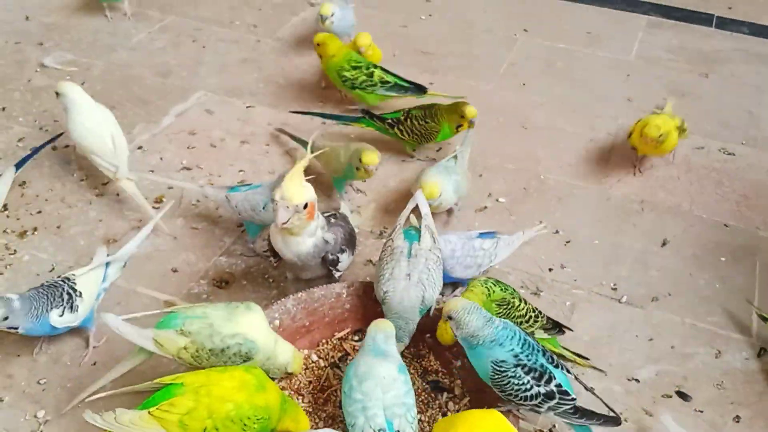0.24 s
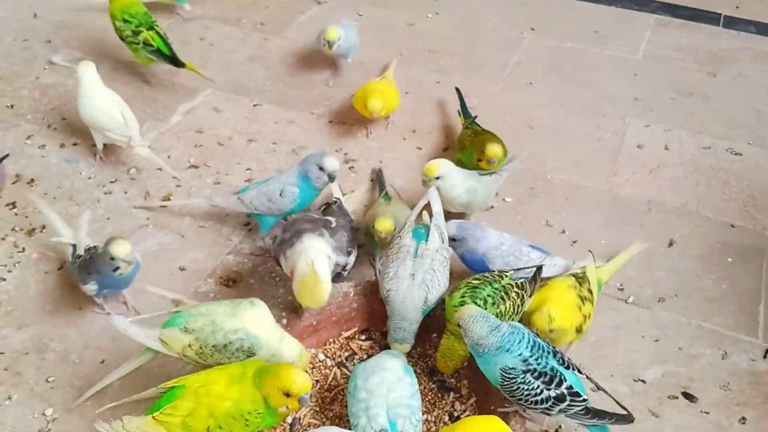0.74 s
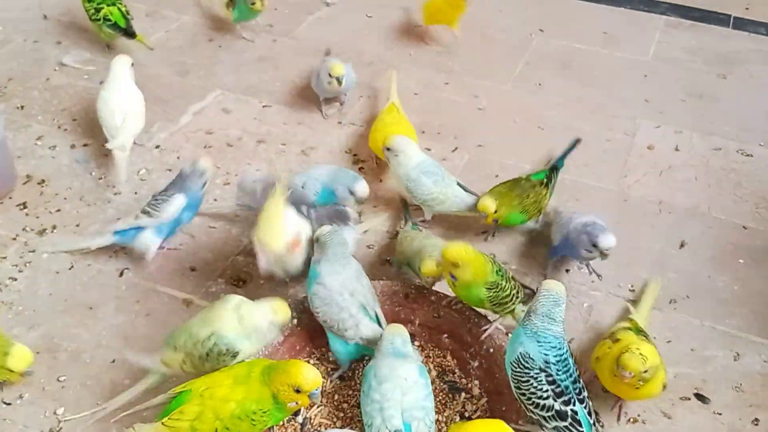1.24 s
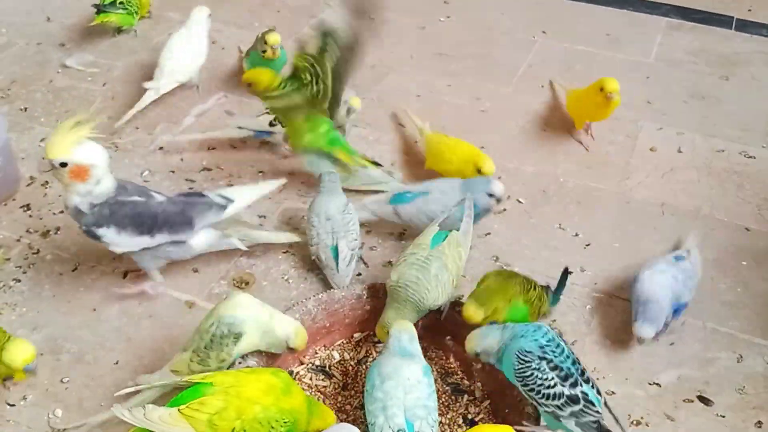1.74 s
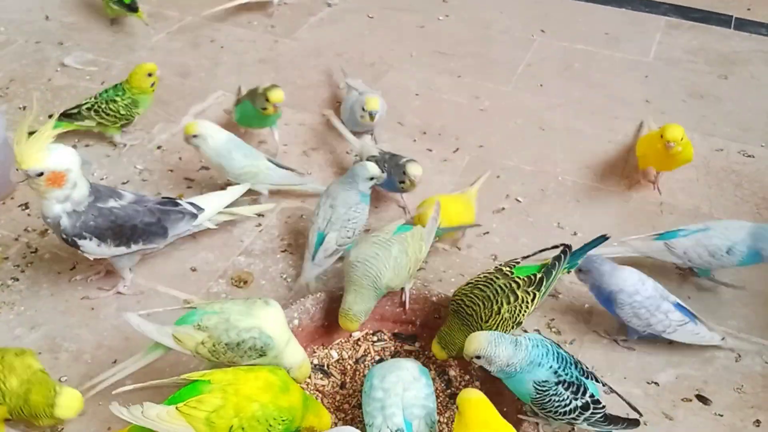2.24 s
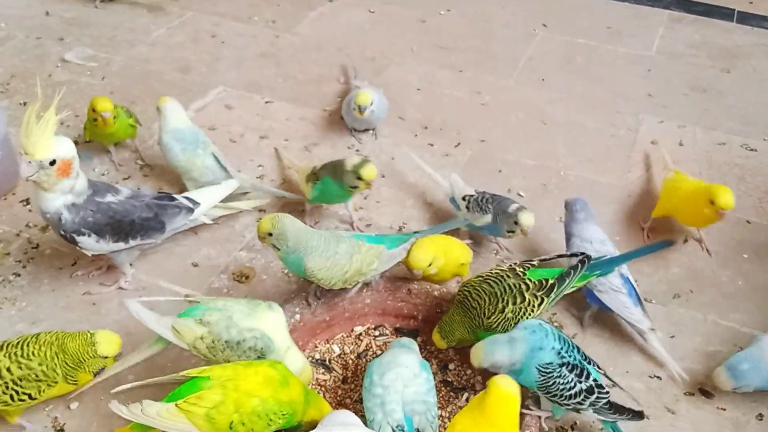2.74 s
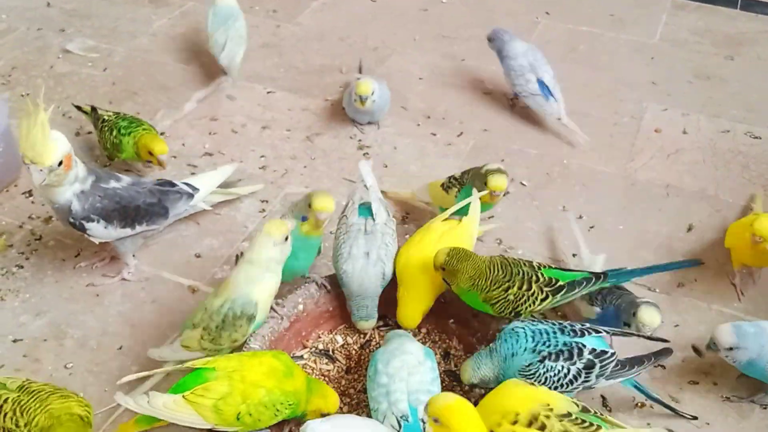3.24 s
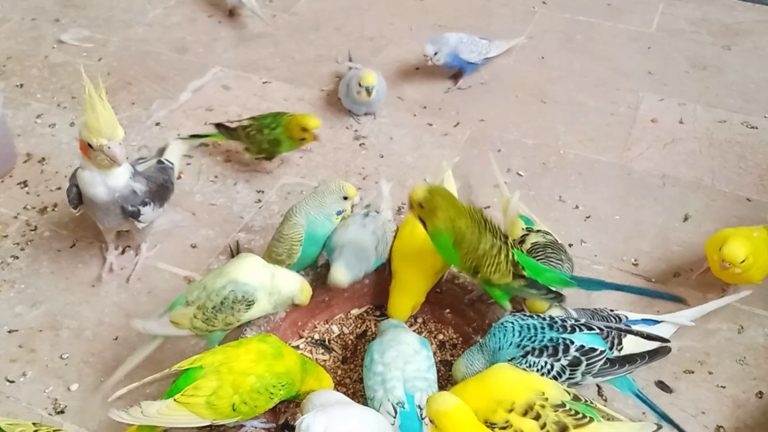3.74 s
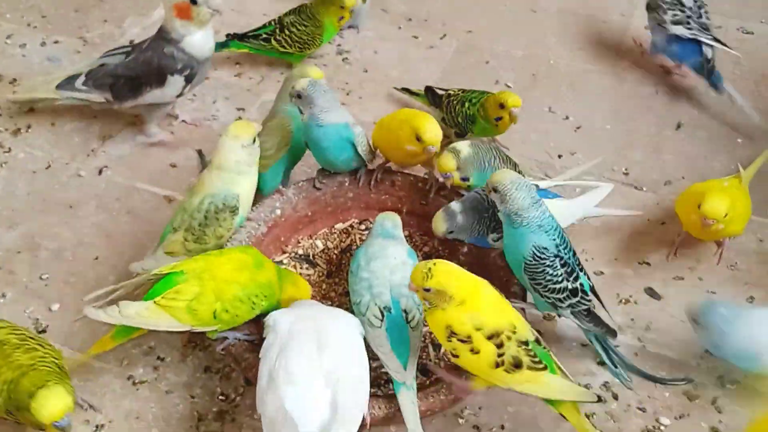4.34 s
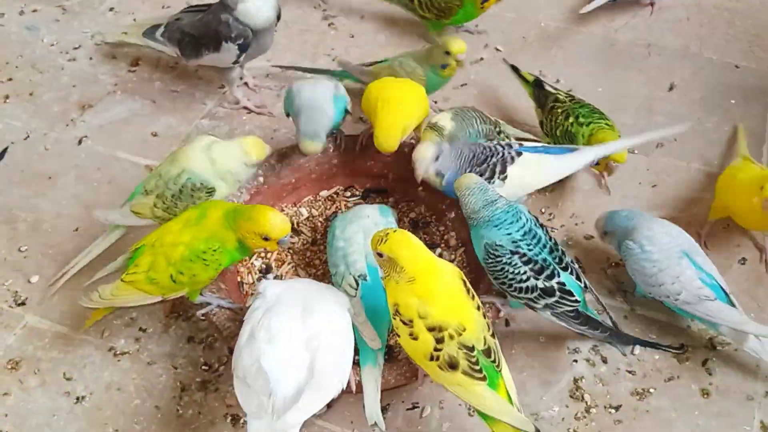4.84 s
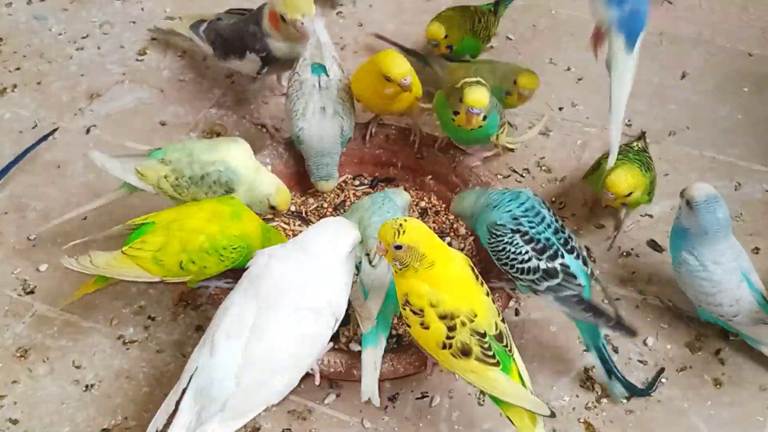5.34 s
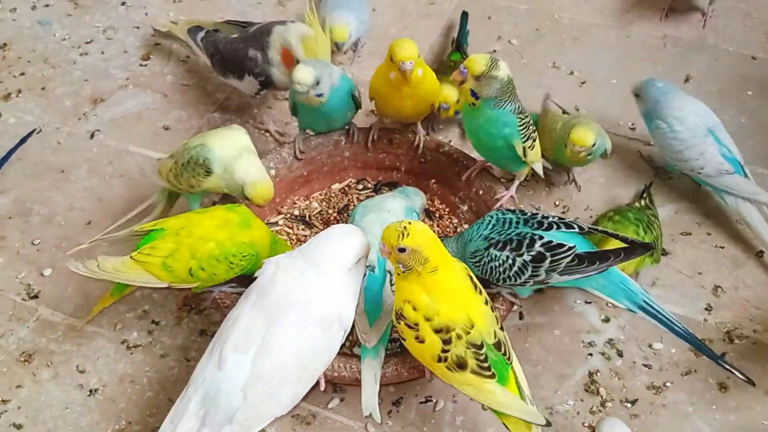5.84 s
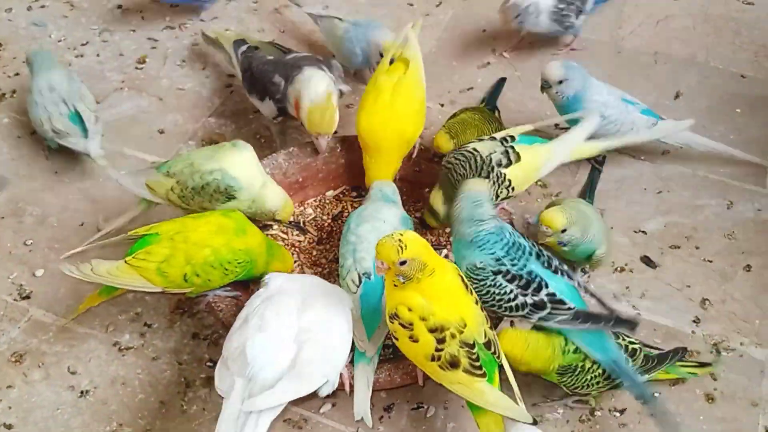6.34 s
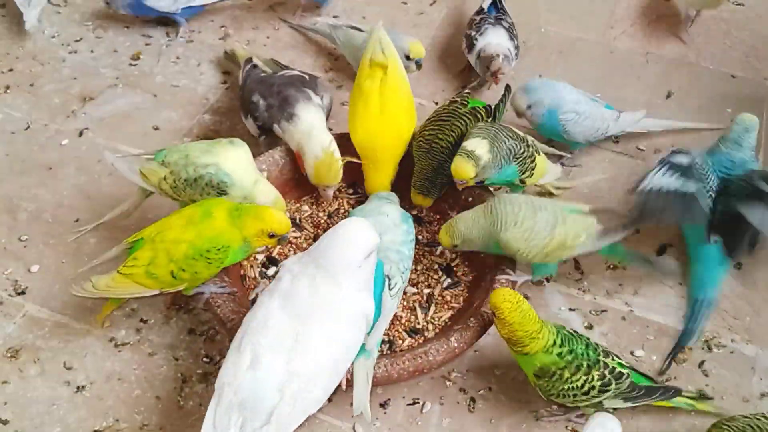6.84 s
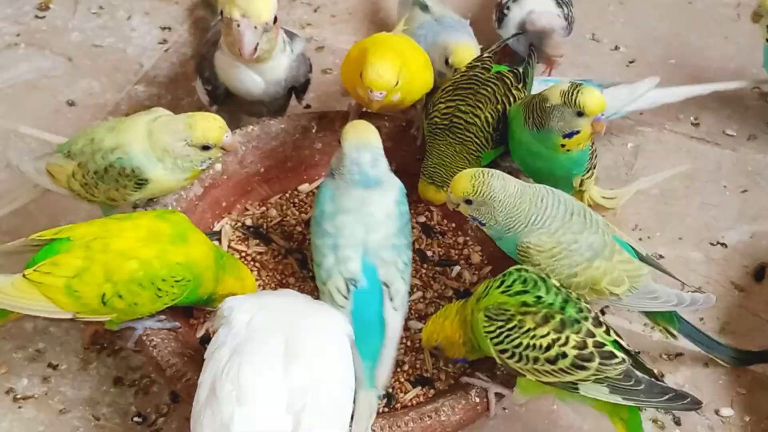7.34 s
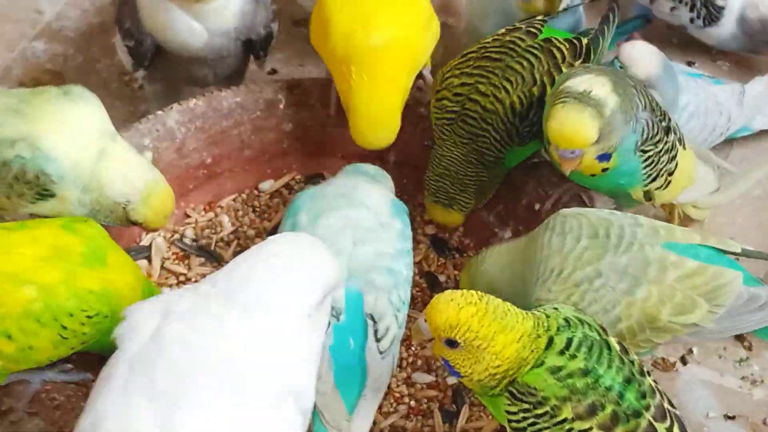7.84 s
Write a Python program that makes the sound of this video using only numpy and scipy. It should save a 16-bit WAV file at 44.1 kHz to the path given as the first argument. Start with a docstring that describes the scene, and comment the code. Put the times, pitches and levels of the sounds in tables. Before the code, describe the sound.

Budgie-like chirps, whistled notes and hoarse squawks build into a dense chatter, broken by fluttering take-offs and wind-like knocks in a hard-walled room.

```python
"""Small parrots feeding in a hard-walled room

Close to the microphone, short arching chirps built from harmonics and dry noise cracks of beaks on seed.
Around them, held notes, one long steady call, a low moan and hoarse squawks of two tumbling voices.
Birds taking off whirr their wings (pulsed noise), blow gusts on the microphone and knock it with low pushes.
A faint hum and room hiss run underneath at changing levels; random decaying tails give the room's echo."""
import sys
import numpy as np
from scipy import signal
from scipy.fft import rfft, irfft, next_fast_len
from scipy.io import wavfile
from scipy.ndimage import map_coordinates

SR = 44100
rng = np.random.default_rng(int(sys.argv[2]) if len(sys.argv) > 2 else 0)


def bounce(signal):
    """Save signal as a 16-bit WAV file at the path given by the first command-line argument."""
    frames = np.transpose(np.atleast_2d(signal))
    limited = np.clip(frames, -1, 1)
    pcm = np.round(limited * 32767).astype(np.int16)
    wavfile.write(sys.argv[1], SR, pcm)


N = 356328

# All levels are relative: the mix sets the final balance.
# Room tone. Each row: time in seconds, hum level in dB, hiss level in dB.
BACKGROUND = [(0, -51, -71), (.5, -60.5, -64.5), (1.07, -76.5, -84.5), (1.12, -59.5, -65), (1.9, -64, -72),
              (2.1, -62.5, -67), (4, -64.5, -66.5), (6, -58.5, -63), (7.2, -62, -67), (7.5, -57, -67),
              (8.04, -67, -79), (8.08, -66, -70)]
# Colour of the room hiss. Each row: frequency in Hz, relative level in dB.
HISS_SPECTRUM = [(80, -49), (150, 7.5), (480, -10), (800, -5.5), (2000, -9.5), (3500, -16), (6000, -31.5),
                 (11000, -24), (22000, -72)]
# Echo of the hard walls. Each row: frequency in Hz, time to decay by 60 dB in seconds.
ROOM_T60 = [(300, 0.8), (2500, 0.37), (9000, 0.41)]
# Response of the microphone. Each row: frequency in Hz, gain in dB.
MIC_RESPONSE = [(20, -2.5), (6000, 2), (8500, 0.5), (10500, -8.5), (12500, -25.5), (15400, -40)]
HUM_HZ, BAND_LIMIT_HZ = 69.1, 15480

# Wing whirr at take-off. Each row: full strength from in seconds, level in dB, then rise, hold and fall in seconds.
WHIRR_BOUTS = [(.01, -49.5, 0.11, 0.16, 0.061), (1.82, -50, 0.081, 0.0064, 0.15),
               (2.92, -38, 0.37, 0.27, 0.19), (4.09, -29, 0.067, 0.27, 0.28),
               (5.55, -39.5, 0.08, 0.011, 0.14), (5.8, -33, 0.13, 0.43, 0.2),
               (6.8, -30.5, 0.028, 0.18, 0.18), (7.4, -54.5, 0.18, 0.25, 0.11)]
# Gusts on the microphone. Each row: full strength from in seconds, level in dB, then rise, hold, fall in seconds.
GUST_BOUTS = [(.16, -39.5, 0.51, .01, 0.25), (1.82, -47.5, 0.23, .01, 0.2), (2.92, -54, 0.84, .01, 1),
              (4.09, -29.5, 0.18, .25, 0.4), (4.7, -39, 0.3, .07, 0.046), (5.58, -37, 0.063, .01, 0.15),
              (6.19, -45, 0.51, .01, 0.29), (6.8, -20, 0.083, .15, 0.23), (7.07, -15.5, 0.08, .01, 0.055),
              (7.25, -53.5, 0.041, .2, 0.65)]
# Feathers rustling close by. Each row: full strength from in seconds, level in dB, then rise, hold, fall in seconds.
RUSTLE_BOUTS = [(.1, -66, 0.15, 0.023, 0.079), (6.82, -57.5, 0.042, 0.064, 0.085)]
# Colour of the whirr. Each row: frequency in Hz, relative level in dB.
WHIRR_SPECTRUM = [(88, -42.5), (150, -5.5), (281, -3.5), (360, 1), (425, 7), (535, 4.5), (1040, -20.5),
                  (1500, -31.5), (1950, -48), (3300, -120)]
# Colour of the gusts. Each row: frequency in Hz, relative level in dB.
GUST_SPECTRUM = [(12, -55), (20, -32), (46, 3.5), (70, 4), (128, 3.5), (296, -10.5), (400, -30), (520, -45),
                 (880, -120)]
# Colour of the rustling. Each row: frequency in Hz, relative level in dB.
RUSTLE_SPECTRUM = [(2500, -120), (4500, -13), (6500, 6.5), (9500, 12.5), (14000, -16.5)]
SWELL_DB = 20  # level change over one rise or fall time
FAR_WHIRR_DB, FAR_GUST_DB = -6, -7  # restless wings elsewhere, over the hum level in BACKGROUND
# Single wing strokes that knock the microphone. Each row: start in seconds, level in dB.
THUMPS = [(2.683, -45.5), (4.226, -33.5), (5.581, -34.5), (6.791, -28.5), (7.046, -15.5), (7.061, -18.5)]
THUMP_HZ, THUMP_T60_S = 85.5, 0.117

# A low hollow moan. Each row: time in seconds, pitch in Hz, level in dB.
MOAN = [(7.12, 476, -48.5), (7.14, 456, -40), (7.482, 495.4, -78), (7.512, 430.5, -57), (7.75, 466, -66)]
# Held notes. Each row: start in seconds, length in seconds, level in dB, fade in dB, pitch in Hz, end pitch in Hz,
# 2nd harmonic over the fundamental in dB.
NOTES = [(0, 0.094, -42.5, 21, 3390, 3480, -42), (0, 0.058, -45, 1, 3030, 3020, -45),
         (0, 0.022, -37, 31, 1133, 1140, 4), (0.234, 0.11, -62, -3.5, 3530, 3280, -25),
         (0.274, 0.12, -64.5, -3, 1770, 1646, -40), (0.297, 0.1, -57.5, -8, 3103, 2885, -45),
         (0.461, 0.031, -52.5, -7.5, 1383, 1393, -41), (1.089, 0.082, -58.5, 2, 1410, 1460, 15),
         (1.246, 0.06, -53, -1, 954, 913, -3), (1.353, 0.068, -57, -5, 1480, 1216, -12),
         (1.427, 0.15, -47, 7, 1290, 1229, -21), (1.525, 0.089, -43, 5, 1900, 1752, -51),
         (1.692, 0.26, -37, 26.5, 1536, 1706, -32), (1.689, 0.34, -36.5, 27.5, 3425, 3370, -23),
         (4.04, 0.12, -41, 0, 3277, 3314, -41), (4.587, 0.29, -36.5, 2.5, 2954, 2945, -24),
         (4.638, 0.021, -20.5, 1, 3056, 3030, -21), (4.659, 0.045, -25.5, 3.5, 3900, 3860, -45.5),
         (4.759, 0.17, -34, 14, 1997, 2052, -27), (4.808, 0.027, -25.5, -5.5, 3030, 3055, -34),
         (4.824, 0.039, -30.5, -5.5, 3834, 3960, -57), (4.865, 0.45, -32, 23, 3000, 3090, -18),
         (4.681, 0.37, -39, 1, 3850, 3876, -31.5), (5.387, 0.094, -46, -6, 2875, 2790, -6),
         (5.166, 0.088, -31.5, 19, 1613, 1566, -5.5), (5.58, 0.057, -30.5, 19.5, 2830, 2950, -20),
         (5.645, 0.04, -28, 9.5, 2904, 2933, -14.5), (5.718, .03, -24.5, 6.5, 2850, 3680, -26),
         (5.735, 0.064, -31.5, 5, 3040, 3350, -28), (5.677, 0.45, -47, 4.5, 2895, 2884, -13.5),
         (6.387, 0.085, -50.5, -3, 1744, 1545, -32), (6.422, 0.26, -42, 17, 1540, 1457, -26.5),
         (6.435, 0.13, -49.5, -2, 3250, 2974, -29.5), (6.66, 0.09, -49, 4, 2290, 2540, -34),
         (6.629, 0.24, -54, 0, 3300, 3000, -23), (6.705, 0.016, -30, -2, 2985, 3275, -37),
         (6.807, 0.024, -33.5, -7, 3260, 3052, -40), (6.816, 0.056, -40, 11, 3247, 3300, -18),
         (7.977, 0.087, -75, 0, 2800, 2900, -21)]
NOTE_ROLLOFF_DB = 10.5  # each harmonic above the 2nd lies this far under the one before
# One long steady call. Each row: time in seconds, pitch in Hz, fundamental in dB, 2nd harmonic in dB.
LONG_CALL = [(2.385, 1183, -66, -59), (2.397, 1161, -35, -42), (2.435, 1116, -43, -41.5),
             (2.529, 1092, -37, -42), (2.858, 1133, -48, -49), (2.917, 1139, -43.5, -58),
             (2.95, 1027, -59, -48)]
# Harmonics 3 to 6 of the long call: level relative to the 2nd in dB.
LONG_CALL_UPPER_DB = (-7, -11, -31, -40)
# Hoarse squawks. Each row: start in seconds, length in seconds, level in dB, fade in dB, pitch in Hz,
# end pitch in Hz, overtones in dB, low rasp in dB.
SQUAWKS = [(0, 0.069, -33.5, 36, 3016, 3060, -31, 5), (1.139, 0.23, -42, 30, 3330, 3017, -18, -2),
           (1.289, 0.36, -50, -9, 2738, 1974, -12, -25), (1.627, 0.1, -35, -7.5, 2258, 2943, -22.5, -11.5),
           (1.691, 0.19, -31, 17, 3320, 3257, -5.5, 12), (1.976, 0.17, -26.5, 5.5, 3161, 2700, -12, -27),
           (2.123, 0.28, -34.5, -1, 3023, 2750, -19.5, -22), (2.399, 0.16, -54, -12, 2264, 2380, -14, -6),
           (2.828, 0.18, -29, 19, 2225, 2357, -18, 2), (3.873, 0.34, -34, 10.5, 2434, 2400, -19.5, -15),
           (4.108, 0.27, -39.5, -3.5, 2970, 2202, -11, 7),
           (4.555, 0.094, -31.5, -10.5, 2910, 2920, -16.5, -11.5),
           (4.633, 0.33, -17, 20.5, 3003, 3076, -10, -19), (4.888, 0.14, -19, 19, 3114, 3100, 1.5, -7.5),
           (4.999, .3, -25.5, 14, 3094, 3070, -7.5, -12), (5.733, 0.25, -35.5, 15, 3250, 3556, -21, -45),
           (5.948, 0.12, -36, 5.5, 4210, 4000, -20, -17), (6.434, 1, -54.5, 30.5, 3150, 2635, -15.5, -1),
           (6.77, 0.26, -38.5, 26, 3093, 2630, -11.5, 14)]
# Throat colour of the squawks. Each row: frequency in Hz, gain in dB.
THROAT = [(1000, -0.8), (3000, 1.47), (5500, 5.5), (6800, -2), (7800, -0.5), (9500, 2), (11000, -9),
          (14500, 13.5)]

# Beaks on seed. Each row: start in seconds, level in dB.
PECKS = [(3.905, -30), (5.642, -49), (7.18, -57), (7.8501, -53)]
# Chirps. Each row: time 4 ms after the onset in seconds, level in dB, top pitch in Hz,
# 2nd harmonic over the fundamental in dB, length in seconds (held to 8-80 ms).
CHIRPS = [(1.173, -24, 3520, -14.5, 0.018), (1.221, -24.5, 3320, -21, 0.018),
          (1.277, -20, 3087, -26.5, 0.02), (1.389, -38, 1780, -38, 0.016), (1.427, -26.5, 2490, -23, 0.024),
          (1.483, -16.5, 2326, -13, 0.015), (1.618, -16, 2278, -6.5, 0.013), (1.67, -22, 2156, -35, 0.032),
          (1.68, -26, 3270, -18, 0.022), (2.848, -16.5, 2425, -16.5, 0.012), (2.895, -27, 3210, -12, 0.016),
          (2.946, -19.5, 2464, -17, 0.025), (2.983, -19.5, 2370, -12, 0.0091),
          (3.027, -15.5, 2440, 0.5, 0.0098), (3.1045, -16, 2450, -1, 0.018), (3.183, -17, 2680, -5, 0.021),
          (3.249, -18, 2830, -8.5, 0.03), (3.313, -16.5, 2650, -6, 0.0081),
          (3.322, -14, 3114, -15.5, 0.024), (3.369, -22.5, 2825, -13, 0.036),
          (3.406, -19.5, 2760, -14.5, 0.026), (3.428, -22.5, 2677, 1, 0.023), (3.489, -16, 2775, -6, 0.021),
          (3.541, -22.5, 2760, -6.5, 0.025), (3.599, -21.5, 2667, -10, 0.03),
          (3.629, -33.5, 2450, -2, 0.041), (3.663, -18.5, 2726, -6.5, 0.022),
          (3.718, -19, 2700, -2.5, 0.025), (3.783, -20.5, 2760, -4.5, 0.032),
          (3.839, -17, 2780, -1.5, 0.026), (3.898, -17, 2415, -10.5, 0.041), (3.966, -25, 2390, -22, 0.034),
          (3.97, -19, 2600, -2, 0.029), (4.032, -23.5, 2630, -33, 0.048), (4.057, -23, 2696, -3, 0.036),
          (4.158, -14.5, 2750, -14, 0.011), (4.23, -20, 2374, -1, 0.031), (4.299, -13.5, 2800, -2, 0.028),
          (4.356, -13, 2550, 2, 0.023), (4.424, -14.5, 2624, 1, 0.027), (4.5008, -14.5, 2570, 4.5, 0.032),
          (4.554, -15.5, 2514, 4, 0.023), (4.615, -23.5, 2994, 15, 0.027), (4.82, -25, 2300, 20, 0.012),
          (4.9, -20.5, 2280, 17, 0.029), (4.989, -18, 2160, 11, 0.018), (5.035, -16.5, 2050, 7, 0.038),
          (5.116, -20, 1987, 6, 0.026), (5.194, -18, 2540, 8.5, 0.018), (5.359, -20.5, 2855, -10, 0.033),
          (5.42, -19.5, 2124, -5, 0.035), (5.493, -21.5, 2238, -2.5, 0.021), (5.51, -25, 2700, 3.5, 0.021),
          (5.561, -26, 2140, 4, 0.035), (5.572, -24.5, 2760, -3, 0.023), (5.644, -26, 2760, 2, 0.014),
          (5.812, -15.5, 1577, 36, 0.012), (5.8124, -27, 2095, 1, 0.033), (5.88, -23, 1740, 15, 0.034),
          (5.947, -19.5, 1730, 5, 0.023), (5.952, -17.5, 2315, 17, 0.021), (5.974, -25.5, 2695, 7, 0.012),
          (6.021, -28.5, 1682, -2, 0.022), (6.023, -17, 2150, 24, 0.028), (6.038, -32, 1670, -12, 0.011),
          (6.267, -43, 2130, -6, 0.038), (6.352, -33, 2125, -15.5, 0.06), (6.608, -31.5, 1950, -35, 0.018),
          (6.631, -42, 3480, -19, 0.026), (6.652, -34, 2380, -32, 0.039), (6.789, -23.5, 2464, -42, 0.048),
          (6.894, -24.5, 2710, -40.5, 0.036), (7.397, -35, 2170, -26, 0.026),
          (7.457, -31.5, 2360, -26, 0.014), (8.06, -44.5, 2620, -11, 0.026)]
# Each run of chirps comes from one bird with its own contour. Each row: run begins in seconds,
# starting pitch in Hz (at most 0.92 of the top), pitch drop at the end as a fraction of the top,
# 3rd harmonic over the 2nd in dB at a top pitch of 1.5 kHz.
CALLERS = [(1.1, 2830, 0.52, 19.5), (1.36, 1960, 0.22, -2), (1.68, 1310, 0, -5), (2.8, 2290, 0.21, 5),
           (3.15, 1905, 0.23, -2), (3.62, 990, 0.3, 3.5), (3.65, 1903, 0.5, -8.5), (3.95, 970, 0.12, -0.5),
           (4.02, 1540, 0.15, 4.5), (4.25, 1685, 0.49, 5.5), (4.8, 1820, 0, -2), (5.15, 2400, 0, 6),
           (5.3, 1100, 0, -4), (5.46, 1873, 0, -8.5), (5.565, 1370, 0.06, -10), (5.8, 1572, 0.13, -7),
           (6.2, 1114, 0, -4), (6.62, 1485, 0.73, -3), (6.75, 833, 0.4, -6.5), (6.85, 1247, 0.02, 8),
           (7.3, 1530, 0, 13)]
THIRD_FALLS_DB_PER_KHZ = 15  # the throat damps the 3rd harmonic of higher chirps


def amp(db):
    """Gain of a level in dB."""
    return 10 ** (np.asarray(db) / 20)


def unit(x):
    """x at an RMS of one."""
    return x / np.sqrt(np.mean(x ** 2) + 1e-20)


def along(points, hz):
    """(Hz, value) points read off a log frequency axis."""
    f, v = np.transpose(points)
    return np.interp(np.log(hz + 1), np.log(f + 1), v)


def curves(rows):
    """One value per sample for each column after the time."""
    s, *cols = np.transpose(rows)
    return [np.interp(np.arange(N) / SR, s, c) for c in cols]


def wobble(rate, size=N):
    """A smooth random curve of size samples, rate knots a second."""
    knots = rng.standard_normal(size // 40 if size == N else SR // 40)
    return map_coordinates(knots, [np.arange(size) * rate / SR], mode="mirror")


def turns(hz):
    """Phase in radians of a voice whose pitch follows hz sample by sample."""
    return 2 * np.pi * np.cumsum(hz) / SR


def coloured(x, spectrum):
    """x through a spectrum of (Hz, dB) points."""
    m = next_fast_len(N + 8192)
    return irfft(rfft(x, m) * amp(along(spectrum, np.fft.rfftfreq(m, 1 / SR))), m)[:N]


def swells(rows):
    """Gain of bouts that rise, hold and fall at their own speeds."""
    t = np.arange(0, N + 64, 64) / SR
    gain = np.zeros(len(t))
    for s, db, rise, hold, fall in np.abs(rows) * (1, -1, 1, 1, 1):  # every level is below 0 dB
        before = np.clip(s - t, 0, 9) / rise
        after = np.clip(t - s - hold, 0, 9) / fall
        gain += amp(db - SWELL_DB * (before + after))
    return np.interp(np.arange(N) / SR, t, gain)


def held(rows, jitter, shimmer_db, rate=200, flutter=60, wander=0):
    """A held note: harmonics of one slightly unsteady pitch, each flickering in level on its own."""
    s, hz, *levels = np.transpose(rows)
    a, n = round(s[0] * SR), round((s[-1] - s[0]) * SR)
    t = s[0] + np.arange(n) / SR
    unsteady = wobble(rate, size=n) + wander * wobble(35, size=n)
    phase = turns(np.interp(t, s, hz) * (1 + jitter * unsteady))
    tone = np.zeros(n)
    for k, db in enumerate(levels, 1):
        shimmer = shimmer_db * np.tanh(wobble(flutter, size=n))
        tone += amp(np.interp(t, s, db) + shimmer) * np.sin(k * phase)
    out = np.zeros(N + SR)
    out[a:a + n] = tone * signal.windows.tukey(n, min(1, 0.017 * SR / n))
    return out[:N]


def background():
    """A steady low hum and the coloured noise of the room, each drifting slightly in level."""
    hum_db, hiss_db = curves(BACKGROUND)
    hum = np.sin(turns(HUM_HZ + 0.2 * wobble(24))) * amp(1.5 * wobble(6))
    hiss = unit(coloured(rng.standard_normal(N), HISS_SPECTRUM)) * amp(1.5 * wobble(6))
    return amp(hum_db + 4.0) * hum + amp(hiss_db) * hiss


def room(x):
    """Each overlapping slice of sound gets its own decaying tail, as the birds sit all over the room."""
    step = SR // 5
    out, x = np.zeros(N + 3 * SR), np.pad(x, (step, 2 * step))
    fade = signal.windows.hann(2 * step, sym=False)
    for a in range(0, N + step, step):
        hz, t, z = signal.stft(rng.standard_normal(SR // 2), SR, nperseg=256)
        decay = amp(-60 * t / along(ROOM_T60, hz)[:, None])
        tail = signal.istft(z * decay, SR, nperseg=256)[1]
        wet = signal.fftconvolve(fade * x[a:a + 2 * step], tail / np.linalg.norm(tail))
        out[a + 200:][:len(wet)] += wet  # the echo trails by 200 samples
    return out[step:step + N]


def wing_noise(beat, beat_db, lump_db, rate, spectrum):
    """Noise pulsed by the wing beat and made lumpy at random, then coloured."""
    level_db = beat_db * beat + lump_db * wobble(rate)
    return unit(coloured(rng.standard_normal(N) * amp(level_db), spectrum))


def wings():
    """Wing beats pulse the whirr and rustle; the air they push reaches the microphone as lumpy gusts."""
    far_db, _ = curves(BACKGROUND)
    beat = np.sin(turns(17 * (1 + .1 * wobble(1.5))))  # about 17 beats a second
    whirr = wing_noise(beat, 0.41, 2.7, 70, WHIRR_SPECTRUM)
    gust = wing_noise(beat, 2.1, 1.6, 30, GUST_SPECTRUM)
    rustle = wing_noise(beat, 1.9, 3.33, 90, RUSTLE_SPECTRUM)
    whirr_gain = amp(-9.5) * (swells(WHIRR_BOUTS) + amp(far_db + FAR_WHIRR_DB))
    gust_gain = amp(-10.5) * (swells(GUST_BOUTS) + amp(far_db + FAR_GUST_DB))
    return whirr_gain * whirr + gust_gain * gust + swells(RUSTLE_BOUTS) * rustle


def thumps():
    """Each wing stroke knocks the microphone into a low, quickly decaying swing."""
    out, t = np.zeros(N + SR), np.arange(SR // 8) / SR
    for s, db in THUMPS:
        decay = amp(db + 1 - 60 * t / THUMP_T60_S)
        out[round(s * SR):][:len(t)] += decay * np.sin(2 * np.pi * THUMP_HZ * t)
    return out[:N]


def moan():
    """A low hollow moan: a single unsteady sine with no overtones."""
    return held(MOAN, jitter=0.08, shimmer_db=4.0)


def note(s, length, db, fade_db, hz, end_hz, second_db):
    """One held note of four harmonics: pitch glides and level fades evenly from start to end."""
    levels = db + np.array([0, second_db, second_db - NOTE_ROLLOFF_DB, second_db - 2 * NOTE_ROLLOFF_DB])
    rows = [(s, hz, *levels), (s + length, end_hz, *(levels - fade_db))]
    return held(rows, jitter=.033, shimmer_db=6, rate=400, flutter=120, wander=.4)


def steady_call():
    """The long call: six harmonics, the upper four following the 2nd."""
    rows = [(*row, *(row[-1] + np.array(LONG_CALL_UPPER_DB))) for row in LONG_CALL]
    return held(rows, jitter=.013, shimmer_db=3, flutter=120)


def squawk(s, length, db, fade_db, hz, end_hz, overtone_db, rasp_db, hoarse):
    """Two voices whose pitch tumbles wildly, broken into rattling pulses."""
    a, n = round(s * SR), round(length * SR)
    u, voices = np.linspace(0, 1, n), np.zeros(n)
    for _ in range(2):
        tumble = hoarse * (.3 * wobble(40, size=n) + wobble(500, size=n))
        phase = turns((hz + (end_hz - hz) * u) * np.exp(tumble))
        uneven_db = 3.3 * wobble(24.0, size=n) + 5.2 * np.tanh(wobble(170.4, size=n))
        regular_db = 3.5 * np.sin(turns(75 * np.exp(0.21 * wobble(30, size=n))))  # near 75 pulses a second
        rattle = amp(uneven_db + regular_db)
        overtones = (np.sin(2 * phase) + 0.23 * np.sin(3 * phase)
                     + 0.48 * np.sin(4 * phase) + .05 * np.sin(5 * phase))
        # the folds also flap at half and quarter speed
        rasp = np.sin(phase / 2) + 0.18 * np.sin(phase / 4)
        voices += rattle * (np.sin(phase) + amp(overtone_db) * overtones + amp(rasp_db) * rasp)
    out = np.zeros(N + SR)
    out[a:a + n] = amp(db - fade_db * u) * unit(voices) * signal.windows.tukey(n, min(1, 0.075 * SR / n))
    return out[:N]


def pecks():
    """Beaks crack seed: short dry bursts of noise, decaying at 60 dB in 14 ms."""
    out, t = np.zeros(N + SR), np.arange(400) / SR
    for s, db in PECKS:
        crack = amp(db + 2.0 - 60 * t / 0.014) * rng.standard_normal(len(t))
        out[round(s * SR):][:len(t)] += crack
    return out[:N]


def chirps():
    """Each chirp sweeps up to its top pitch and may sag again; pitch and level tremble fast."""
    out = np.zeros(N + SR)
    for s, db, top_hz, second_db, length in CHIRPS:
        _, start_hz, drop, over_db = [caller for caller in CALLERS if caller[0] < s][-1]
        third_db = second_db + over_db - THIRD_FALLS_DB_PER_KHZ * (top_hz - 1500) / 1000
        u = np.linspace(0, 1, int(np.clip(length, .008, .08) * SR))
        rise = 1 - min(start_hz / top_hz, .92)
        climb = rise * np.clip(1 - u / 0.4784, 0, 1) ** 1.7
        sag = drop * np.clip(2 * u - 1, 0, 1) ** 2.0
        phase = turns(top_hz * (1 - climb - sag) * (1 + 0.055 * wobble(700, size=len(u))))
        voice = np.zeros(len(u))
        for k, level in enumerate((0, second_db, third_db, third_db - 11.0), 1):
            voice += amp(level + 3.5 * wobble(300, size=len(u))) * np.sin(k * phase)
        voice /= np.sqrt(1 + amp(2 * second_db) + amp(2 * third_db))  # even out strong harmonics
        shape = np.sin(np.pi * u ** 0.72)  # swells a little faster than it fades
        out[round((s - .004) * SR):][:len(u)] += amp(db - 10.5) * shape * voice
    return out[:N]


def scene():
    """Direct sound of every source, the room's echo of the voices and beaks, and the unechoed low layers."""
    near = chirps() + pecks()
    notes = sum(note(*row) for row in NOTES)
    long_call = steady_call()
    hoarse = coloured(sum(squawk(*row, hoarse=0.2) for row in SQUAWKS), THROAT)
    wet = room(amp(-2.5) * near + amp(-1.5) * notes + amp(5.5) * long_call + amp(-5.5) * hoarse)
    low = wings() + thumps() + amp(1.5) * moan() + background()
    direct = near + amp(1.5) * notes + amp(0.5) * long_call + amp(-9.5) * hoarse
    return (direct + wet + low)[None]


def record(dry):
    """The microphone loses treble above 8 kHz and keeps nothing above its band limit."""
    x = coloured(dry[0], MIC_RESPONSE)
    m = next_fast_len(N + 8192)
    in_band = np.fft.rfftfreq(m, 1 / SR) < BAND_LIMIT_HZ
    return irfft(rfft(x, m) * in_band, m)[None, :N]


dry = scene()
out = record(dry)
bounce(out)
```